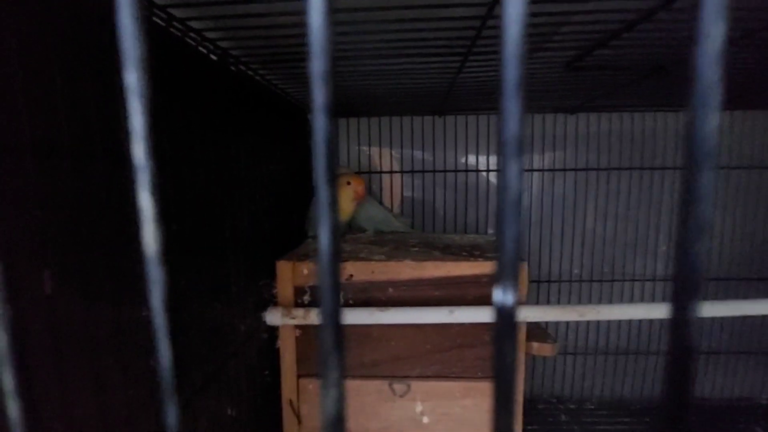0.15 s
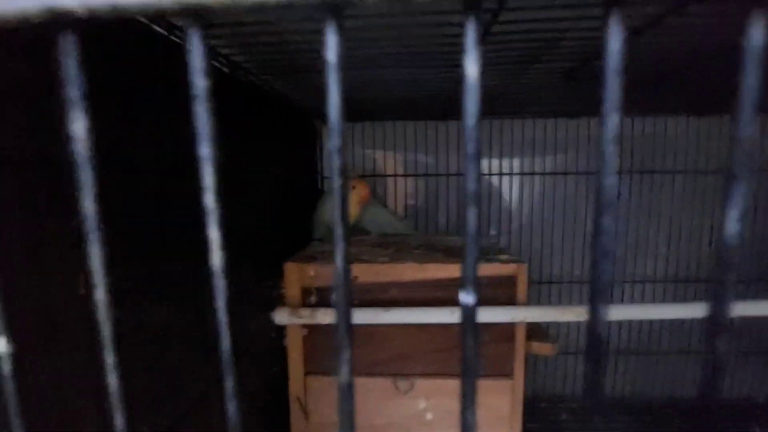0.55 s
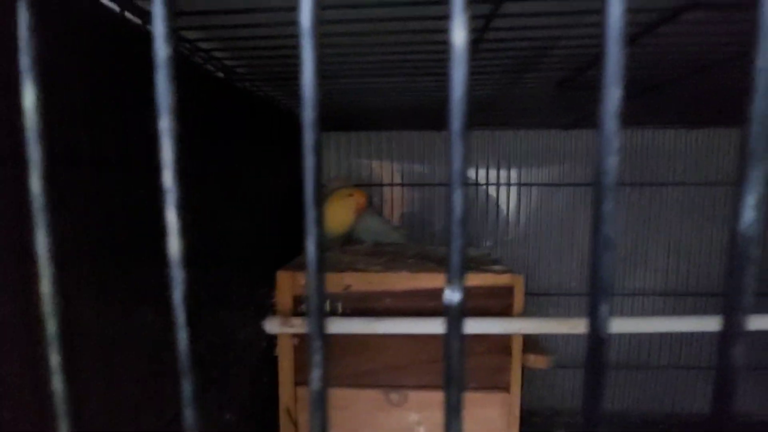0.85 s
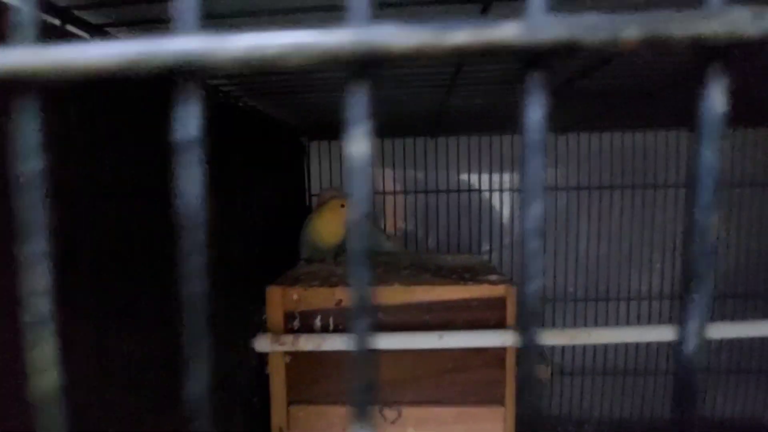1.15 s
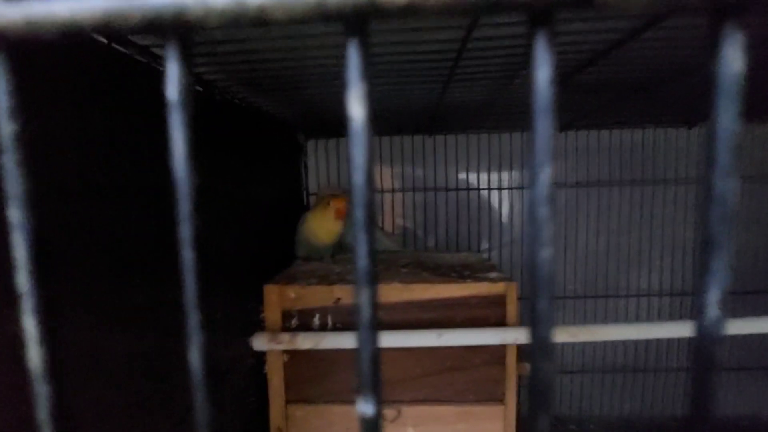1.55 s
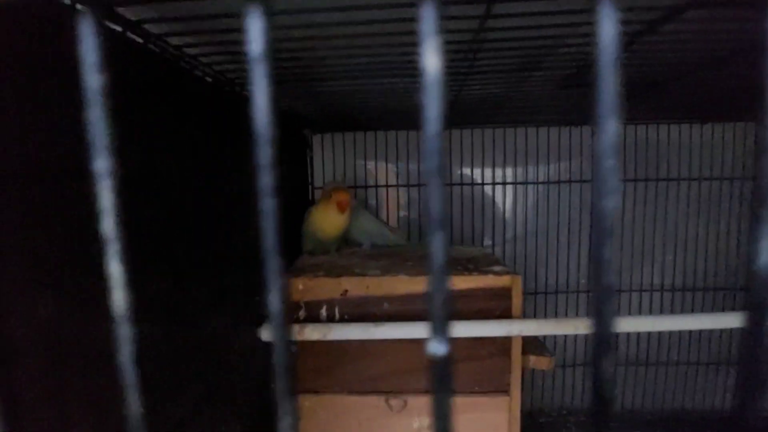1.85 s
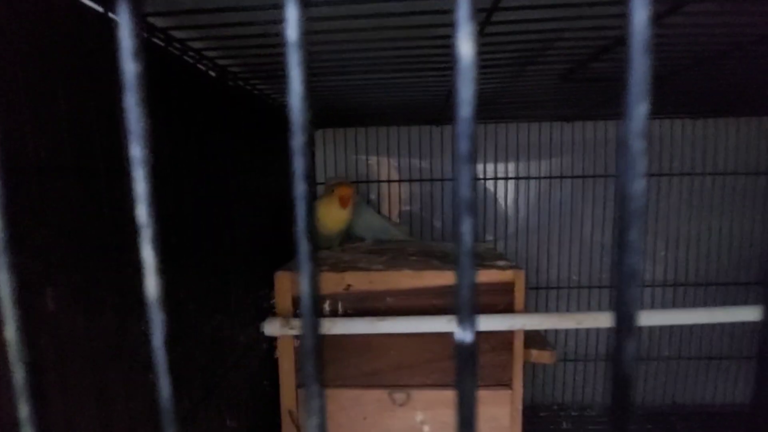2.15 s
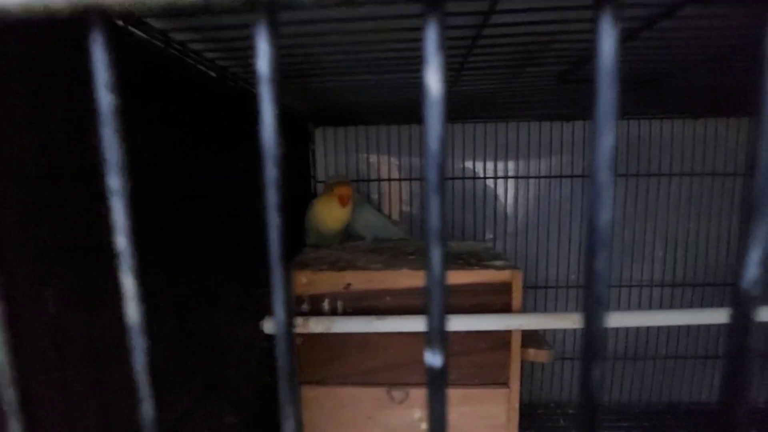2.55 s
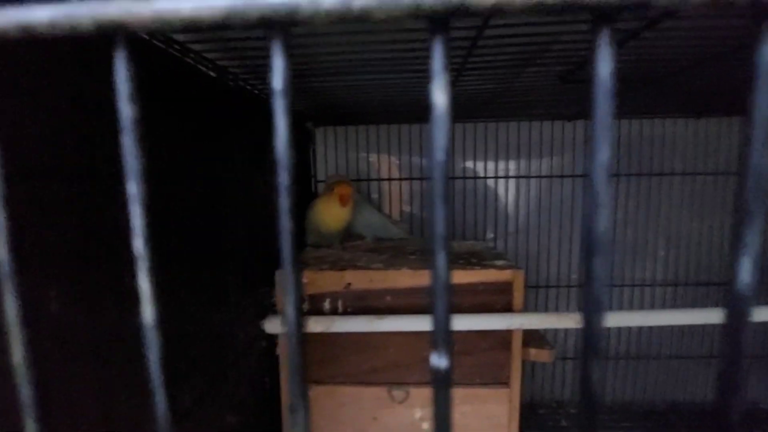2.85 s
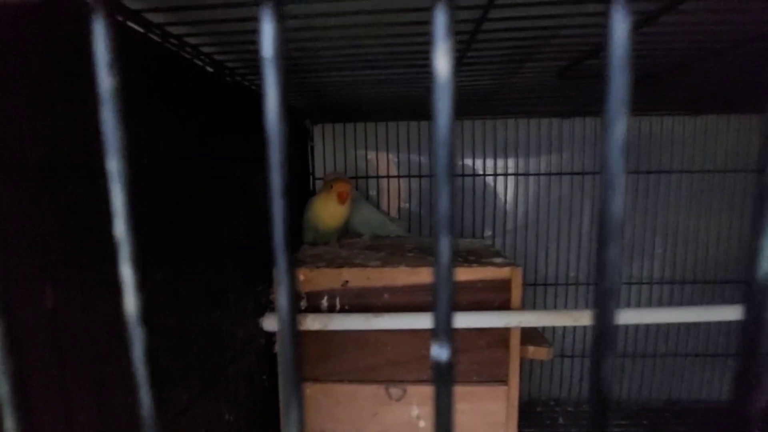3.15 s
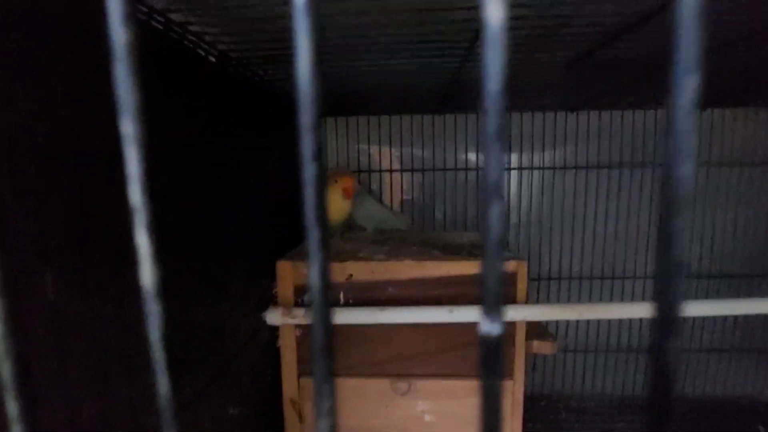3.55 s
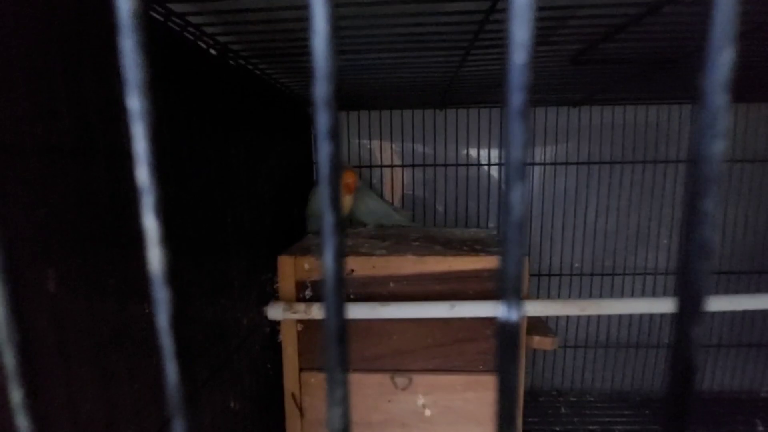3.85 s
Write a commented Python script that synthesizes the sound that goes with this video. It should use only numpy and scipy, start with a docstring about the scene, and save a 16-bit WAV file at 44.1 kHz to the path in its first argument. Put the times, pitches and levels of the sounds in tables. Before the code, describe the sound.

One short shrill parrot squawk near the end, after rustling, a sharp tap and low engine rumble.

```python
"""A small parrot squawks once in a hard-walled aviary, after another bird's short falling chirp.
Both are rasping whistles with overtones and breath. Feathers and feet rustle and knock (shaped noise),
and something taps the left side of the hand-held camera (ringing modes). A single-cylinder engine
outside slows to idle and revs again (multiples of its firing rate). Behind them are faint fuzzy whistles
and thin rustling hisses (narrow noise) and the steady air of the place (coloured noise)."""
import sys
import numpy as np
from scipy import signal
from scipy.fft import rfft, irfft
from scipy.io import wavfile
from scipy.ndimage import uniform_filter1d

SR = 44100
rng = np.random.default_rng(int(sys.argv[2]) if len(sys.argv) > 2 else 0)


def dump_mix(stems):
    """Bounce the given channels to the path in sys.argv[1] as a 16-bit WAV at rate SR."""
    frames = np.atleast_2d(stems).T  # one column per channel
    limited = np.clip(frames, -1, 1)  # hard clip at full scale
    pcm = np.round(limited * 32767).astype(np.int16)
    wavfile.write(sys.argv[1], SR, pcm)


def field_ratio(decibels):
    """Amplitude ratio for a level in dB (20 dB per decade); scalars and array-likes work."""
    return 10 ** (np.asarray(decibels, dtype=float) / 20)


N = 176400  # samples in the scene
T = np.arange(N) / SR  # time in seconds


def evened(x):
    """Scales a sound to an rms of 1."""
    return x / np.sqrt(np.mean(x ** 2) + 1e-20)


def read(points, hz):
    """Reads a curve between its points, on a logarithmic frequency scale."""
    f, value = np.transpose(points)
    return np.interp(np.log(hz + 1), np.log(f + 1), value)


def colour(x, points):
    """Makes each frequency louder or softer by a curve in dB."""
    hz = np.fft.rfftfreq(x.shape[-1], 1 / SR)
    return irfft(rfft(x) * field_ratio(read(points, hz)), x.shape[-1])


def add(mix, start_s, sound):
    """Adds a sound to the mix at its start time, cut off at the end of the mix."""
    part = mix[..., round(start_s * SR):][..., :sound.shape[-1]]
    part += sound[..., :part.shape[-1]]


def resonate(x, hz, width_hz):
    """A resonance of gain 1 that follows the curve hz."""
    turn = np.exp(2j * np.pi * np.cumsum(hz * np.ones(len(x))) / SR)
    r = np.exp(-np.pi * width_hz / SR)
    # shift the pitch down to zero, smooth, and shift it back up
    return 2 * (turn * signal.lfilter([1 - r], [1, -r], x / turn)).real


def resonate_twice(x, hz, width_hz):
    """Two equal resonances in a row fall off more steeply; the result has an rms of 1."""
    return evened(resonate(resonate(x, hz, width_hz), hz, width_hz))


def slow(count, size):
    """Random wandering with an rms of 1: noise averaged twice over size steps."""
    return evened(uniform_filter1d(uniform_filter1d(rng.standard_normal(count), size), size))


# how throat and beak colour a call: f/Hz, level/dB
THROAT_AND_BEAK = [(700, -49), (1250, -49.5), (1500, -6.5), (2500, -4), (3100, -5.5), (3600, -14),
                   (3950, -3.5), (4400, -5), (5800, -3), (6500, -11.5), (7200, 0.5), (8200, 8), (9900, -11),
                   (12000, 10.5), (13700, -5.5), (14200, -38), (15600, -26)]


def call(rows, veil_db):
    """A jittery, rasping whistle with overtones that change with effort, plus breath, through the beak."""
    count = 8000
    breath_db = -6.5
    veil_hz = 6600  # above this a bird that faces away sounds duller
    rasp_hz, rasp_depth = 115, 0.6  # middle rate and depth of an irregular flutter in the throat
    s, hz, db, bright, rough = np.transpose(rows)
    t = T[:count] + s[0]
    k = np.arange(1, 12)[:, None]  # harmonic numbers
    hz = np.interp(t, s, hz)
    bright = np.interp(t, s, bright)

    parts = field_ratio(bright * (k - 1) + veil_db * (k * hz > veil_hz)) * (k * hz < 16000)
    jitter = 1 + np.interp(t, s, rough) * slow(count, size=24)
    turns = np.cumsum(hz * jitter) / SR
    tone = (parts * np.cos(2 * np.pi * k * turns)).sum(0)
    # even out the loudness that the beak will give the tone
    tone = tone / np.sqrt(((parts * field_ratio(read(THROAT_AND_BEAK, k * hz))) ** 2).sum(0) / 2)

    rasp_turns = np.cumsum(rasp_hz * field_ratio(4.4 * slow(count, size=200))) / SR
    rasp = 1 + rasp_depth * np.sin(2 * np.pi * rasp_turns)
    breath = field_ratio(breath_db + 0.5 * bright) * rng.standard_normal(count)
    onset = np.clip(T[:count] / 0.008, 0, 1) ** 2
    level = field_ratio(np.interp(t, s, db, right=-140)) * onset
    return s[0], colour(level * rasp * (tone + breath), THROAT_AND_BEAK)


# the parrot's squawk: t/s, f/Hz, level/dB, brightness/dB per harmonic, pitch jitter/share
SQUAWK_CURVE = [(3.325, 1960, -77, 1.5, .04), (3.352, 2000, -40, -13.5, 0.055),
                (3.372, 2106, -28, -15, 0.052), (3.388, 2243, -24.5, -9, .07), (3.4, 2541, -27.5, 0, 0.084),
                (3.415, 2850, -24, -5, 0.097), (3.433, 2892, -25, -2.5, 0.086),
                (3.443, 2244, -25.5, 0, 0.069), (3.468, 2105, -30, -1.5, 0.036),
                (3.49, 2112, -66, -1.5, .04)]


def squawk():
    """The parrot's pitch climbs and drops again in one quick squawk; gives start and sound."""
    return call(SQUAWK_CURVE, veil_db=-4.8)


# the other bird's chirp: t/s, f/Hz, level/dB, brightness/dB per harmonic, pitch jitter/share
CHIRP_CURVE = [(.412, 2627, -57, -6, 0.14), (.428, 2270, -38, -13.5, 0.17),
               (.443, 1580, -40.5, -12.5, 0.097), (.46, 1490, -37.5, -4, 0.021),
               (.478, 1471, -41.5, -2.5, .03), (.495, 1366, -45.5, -19, 0.015), (.52, 1364, -61, -5, 0.042)]


def chirp():
    """The other bird's pitch falls through one short chirp; gives start and sound."""
    return call(CHIRP_CURVE, veil_db=-3)


# rustles of feathers and feet: t/s, length/s, level/dB, brightness/0-1
RUSTLE_EVENTS = [(0, 0.044, -52, .1), (0.06, 0.072, -51.5, 0.7), (0.128, 0.043, -47, 0.6),
                 (0.199, 0.18, -60, 0.77), (0.286, 0.037, -51, 0.83), (0.343, 0.15, -58.5, .5),
                 (0.937, 0.057, -56, 0.75), (1.158, 0.095, -57, 0.66), (1.196, 0.098, -50, 0.1),
                 (1.436, 0.027, -70, 1.), (2.254, 0.073, -57.5, 0.51), (2.871, 0.056, -82.5, 0.9),
                 (3.784, 0.061, -76, 0.83)]
# the two colours of a rustle: f/Hz, level/dB per Hz
DULL_RUSTLE = [(180, -35.5), (300, -7), (484, -16), (720, -5.5), (1180, -19), (2040, -11.5), (2560, -16.5),
               (2830, -15.5), (6360, -33), (7880, -29.5), (15500, -50)]
BRIGHT_RUSTLE = [(240, -31.5), (400, -1.5), (738, -14.5), (1150, -8.5), (1490, -17.5), (1660, -14),
                 (1910, -16.5), (2590, -15), (3410, -30.5), (3910, -20), (8930, -18), (11600, -14.5),
                 (15500, -26.5)]


def rustles():
    """Grainy bursts of noise, blended from a dull and a bright colour."""
    out, t = np.zeros(N), T[:6000]
    for s, length, db, bright in RUSTLE_EVENTS:
        grains = rng.standard_normal(6000) * field_ratio(3 * slow(6000, size=60))
        bright = np.clip(bright, 0, 1)
        dull_part = (1 - bright) * evened(colour(grains, DULL_RUSTLE))
        bright_part = bright * evened(colour(grains, BRIGHT_RUSTLE))
        rise = np.clip(t / 0.014, 0, 1)
        fall = np.clip((length - t) / (0.37 * length), 0, 1)
        add(out, s, field_ratio(db) * (dull_part + bright_part) * rise * fall)
    return out


# soft knocks of feet on wood: t/s, level/dB, f/Hz
KNOCK_EVENTS = [(.345, -43.5, 680), (.455, -41, 190), (0.67, -50.5, 454), (.07, -51.5, 400),
                (1.1, -54, 230), (5.1, -61, 330), (1.18, -47.5, 420), (1.3, -48, 45), (1.2, -60.5, 340),
                (3.42, -49.5, 249.6)]


def knocks():
    """Dull thuds: a puff of noise in one broad resonance of the wood."""
    t60_s = 0.1  # time to die away by 60 dB
    out, t = np.zeros(N), T[:6000]
    for s, db, hz in KNOCK_EVENTS:
        puff = evened(resonate(rng.standard_normal(6000), hz, 0.32 * hz))
        add(out, s, field_ratio(db - 60 * t / t60_s) * np.clip(t / 0.008, 0, 1) * puff)
    return out


# ringing modes of the tapped shell: f/Hz, level/dB, time to die away by 60 dB/s
SHELL_MODES = [(110.67, -16.5, 0.058), (239.7, -18, .03), (320.3, -16, 0.022), (384, -22, 0.042),
               (890, -31, 0.022), (1450, -25.5, 0.0084), (2593, -15.5, 0.0038), (5600, -35.5, 0.0029),
               (8005, -20.5, 0.0038), (12000, -30, .004)]


def tap():
    """One sharp tap with a brief contact: the shell's modes all start at their peak."""
    start_s, right_db, room_db = 2.6575, -26.5, -29.5
    recoil_hz = 150  # below this the whole body recoils, against the swing of the shell
    t, ring = T[:5000], np.zeros(5000)
    for hz, db, t60_s in SHELL_MODES:
        ring += np.sign(hz - recoil_hz) * field_ratio(db - 60 * t / t60_s) * np.cos(2 * np.pi * hz * t)
    contact = np.hanning(7) / np.hanning(7).sum()
    out = np.zeros(N)
    add(out, start_s, np.convolve(contact, ring))
    return out * field_ratio(np.array([[0], [right_db]])) + field_ratio(room_db) * room(out)


# course of the engine: t/s, firings/per s, level/dB, brightness/dB per octave above the knee
ENGINE_COURSE = [(0, 34.4, -36, 2), (0.202, 34.5, -31.5, -3), (0.402, 31.5, -34, 0),
                 (0.601, 30.3, -35.5, -4), (.8, 30.2, -34, -5), (1.001, 28.1, -40, -5),
                 (1.2, 25.1, -36, -4), (1.399, 25.5, -50, -4), (1.601, 21.6, -47, -3),
                 (1.801, 22.7, -50.5, -6), (1.999, 21.3, -48, -8), (2.4, 22.2, -55, 0.5),
                 (2.801, 20, -59.5, -4), (3.05, 21.4, -49.5, -2), (3.25, 27.4, -40, -4.5),
                 (3.4, 30.7, -37, 0), (3.6, 31.7, -41, 2.5), (3.801, 36.4, -38, -0.5), (4, 37.3, -42, 2.5)]
# how the exhaust colours the engine: f/Hz, level/dB
EXHAUST_COLOUR = [(15, -60), (40, -31), (55, -23.5), (65, -4.5), (72, -13), (85, -6), (100, -4.5),
                  (120, 1.5), (133, -14.5), (150, -16), (190, -16.5), (250, -19.5), (300, -10.5),
                  (350, -23.5), (420, -23.5), (550, -34.5), (900, -44.5), (1400, -52.5)]


def engine():
    """Multiples of the firing rate through the exhaust, each wobbling, over a rumble that follows them."""
    knee_hz = 114  # brightness acts above this
    rumble_db, wobble_db, uneven_rad = -10, 2, 0.016
    s, *rest = np.transpose(ENGINE_COURSE)
    rate, db, bright = (np.interp(T[::20], s, v) for v in rest)  # every 20th sample is enough
    turns, out = np.cumsum(rate) * 20 / SR, np.zeros((2, len(rate)))
    for k in range(1, 26):
        lift_db = bright * np.clip(np.log2(k * rate / knee_hz), 0, 2)
        for ear in out:
            wobble = wobble_db * slow(len(rate), size=120)
            level = field_ratio(read(EXHAUST_COLOUR, k * rate) + lift_db + wobble)
            # uneven firing blurs the higher multiples more
            unevenness = uneven_rad * k ** 2 * slow(len(rate), size=150)
            ear += level * np.cos(2 * np.pi * (k * turns + rng.random()) + unevenness)
    out = signal.resample_poly(field_ratio(db) * out, 20, 1, axis=1)[:, :N]
    rumble = evened(colour(rng.standard_normal((2, N)), EXHAUST_COLOUR))
    rumble = field_ratio(rumble_db + np.interp(T, T[::20], db + bright)) * rumble
    return spread(*(out + rumble))


# faint fuzzy whistles and thin rustling hisses: t/s, length/s, first f/Hz, last f/Hz, level/dB
FAINT_EVENTS = [(0.05, 0.036, 2070, 1680, -48.5), (0.23, 0.13, 2530, 2420, -62.5),
                (0.981, 0.17, 3040, 2250, -73.5), (.6, 0.18, 1300, 2000, -74),
                (0.55, 0.17, 1500, 1560, -76), (1.33, .15, 2200, 1800, -75.5),
                (1.22, 0.096, 1920, 2020, -57.5), (1.22, 0.033, 7870, 7800, -64),
                (0.348, 0.044, 12000, 10800, -61.5), (3.817, 0.081, 2357, 2300, -69.5),
                (3.84, 0.0691, 1840, 1550, -69.5), (0.59, 0.049, 8000, 7900, -71.5),
                (.79, .06, 11300, 11200, -82), (3.794, .06, 8300, 7400, -77.5)]


def faint_whistles_and_hisses():
    """Short and fuzzy: noise through a narrow resonance that glides."""
    out = np.zeros(N)
    for s, length, first_hz, last_hz, db in FAINT_EVENTS:
        u = np.linspace(0, 1, round(length * SR))
        hz = first_hz + (last_hz - first_hz) * u
        fuzzy = resonate_twice(rng.standard_normal(len(u)), hz, 550)
        add(out, s, field_ratio(db) * np.sin(np.pi * u) ** 0.5 * fuzzy)
    return out


# colour of the low wash: f/Hz, level/dB per Hz
WASH_COLOUR = [(26, -32.5), (45, -11.5), (75, -4.5), (117, -5.5), (190, -19), (226, -11.5), (311, -26.5),
               (532, -34), (1280, -45), (1990, -45.5), (3170, -52), (5840, -59), (9300, -51.5),
               (15500, -55)]
# booming of the room: f/Hz, width/Hz, level/dB
BOOMS = [(63.13, 12, -61), (123, 2.3, -70.5)]
# thin steady hiss: f/Hz, width/Hz, level/dB
HISS = (7250, 600, -89)


def floor():
    """Steady air of the place: a low wash of noise, booming resonances and a faint hiss."""
    wash_db = -55.5
    x = field_ratio(wash_db) * evened(colour(rng.standard_normal((2, N)), WASH_COLOUR))
    for hz, width_hz, db in BOOMS + [HISS]:
        noise = rng.standard_normal((2, N))
        x = x + field_ratio(db) * np.array([resonate_twice(v, hz, width_hz) for v in noise])
    return spread(*x)


# reverberation of the aviary: f/Hz, time to die away by 60 dB/s
ROOM_DECAY = [(300, .4), (1500, 0.31), (4000, 0.31), (8000, 0.31), (14000, 0.23)]


def room(x):
    """Hard walls return a dense tail of echoes, each band dying at its own speed."""
    taps = np.zeros((2, SR // 2))
    grid = np.arange(60, SR // 2 - 8, 8)
    at = grid + rng.integers(0, 8, (2, len(grid)))  # one echo at random in every 8 samples
    np.put_along_axis(taps, at, rng.choice([-1., 1.], at.shape), 1)
    hz, t, z = signal.stft(taps, SR, nperseg=128)
    decay = field_ratio(-60 * t / read(ROOM_DECAY, hz)[:, None])
    tail = signal.istft(z * decay, SR, nperseg=128)[1]
    return signal.fftconvolve(x[None], tail / np.linalg.norm(tail[0]), axes=1)[:, :N]


# likeness of left and right: f/Hz, likeness/-1 to 1
LIKENESS = [(60, 0.77), (130, 0.95), (290, 0.83), (640, 0.25), (1410, 0.43), (3100, -0.04), (6820, 0.11),
            (15000, -0.087)]
# left minus right: f/Hz, level/dB
LEFT_MINUS_RIGHT = [(60, -0.5), (110, -1), (200, -3), (380, 1), (700, 4), (1290, 1.5), (2380, 2), (4400, 1),
                    (8120, -3.5), (15000, -5)]


def spread(a, b):
    """Two microphones: mostly alike in the bass, nearly unrelated in the treble."""
    hz = np.fft.rfftfreq(N, 1 / SR)
    same = np.clip(read(LIKENESS, hz), -1, 1)
    side = field_ratio(read(LEFT_MINUS_RIGHT, hz) / 2)  # half for each ear
    left, other = rfft(a), rfft(b)
    right = same * left + np.sqrt(1 - same ** 2) * other
    return irfft([left * side, right / side], N)


def scene():
    """Birds and cages, direct and echoed and louder on the right, with tap, engine and air."""
    dry_db, side_db = -4.5, -2  # side: left gets this, right the opposite
    aviary = rustles() + knocks() + faint_whistles_and_hisses()
    add(aviary, *squawk())
    add(aviary, *chirp())
    aviary = field_ratio(dry_db) * aviary + room(aviary)
    aviary = aviary * field_ratio(np.array([[side_db], [-side_db]]))
    return aviary + tap() + engine() + floor()


def top_cut(x):
    """Nothing passes above the cut-off."""
    return signal.sosfilt(signal.butter(12, 15690, fs=SR, output="sos"), x)


def record(dry):
    """The camera's band limit: a low-pass filter at 15750 Hz."""
    low_pass = signal.firwin(255, 15750, fs=SR)
    mix = signal.oaconvolve(dry, low_pass[None], "same")
    return top_cut(mix)


dry = scene()
out = record(dry)
dump_mix(out)
```